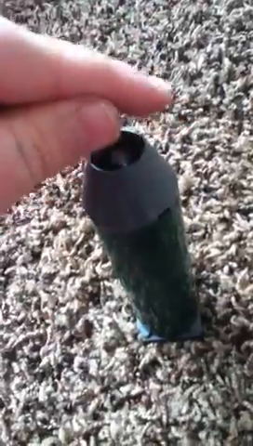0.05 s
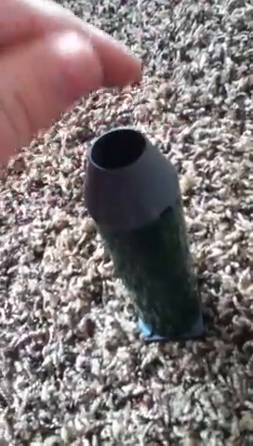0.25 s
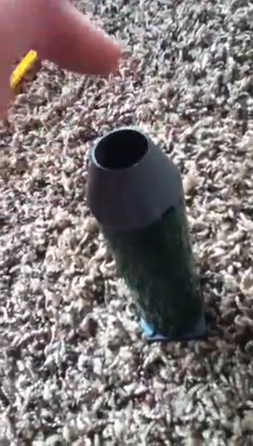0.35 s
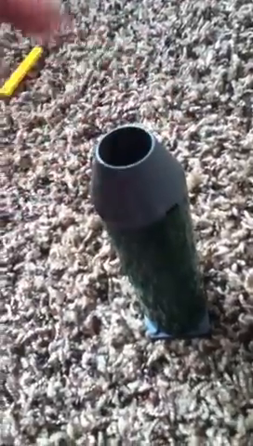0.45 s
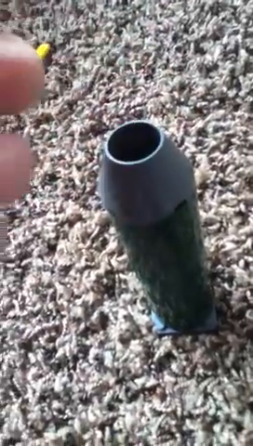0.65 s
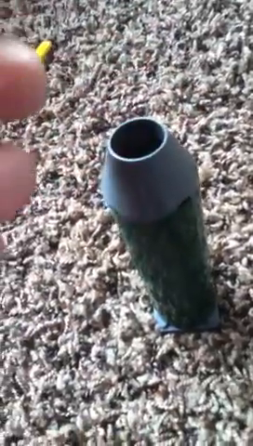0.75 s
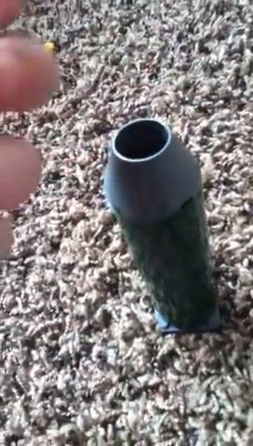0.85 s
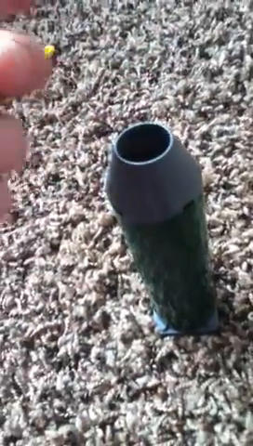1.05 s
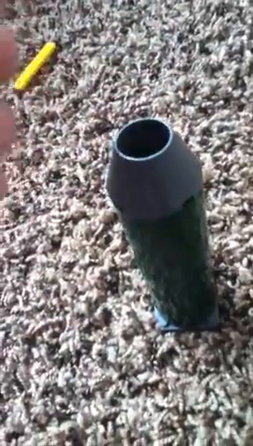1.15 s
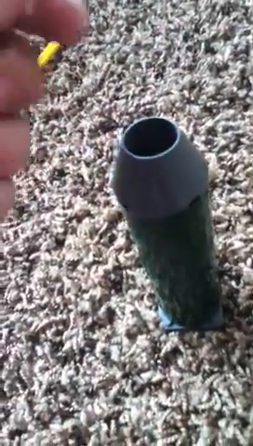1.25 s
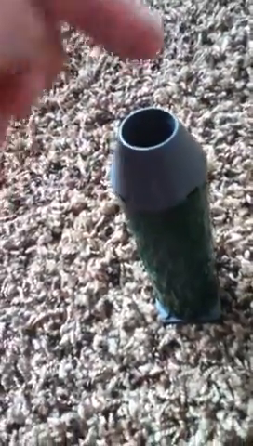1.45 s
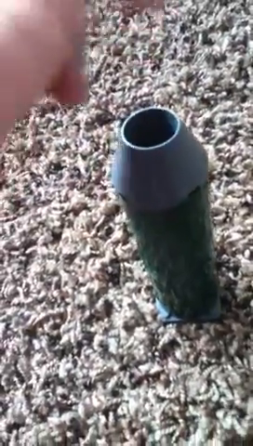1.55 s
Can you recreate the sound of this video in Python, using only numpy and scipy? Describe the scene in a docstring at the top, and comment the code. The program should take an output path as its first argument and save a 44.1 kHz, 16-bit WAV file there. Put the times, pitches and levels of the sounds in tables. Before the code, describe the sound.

Sharp, slightly hollow clicks sound as a small hard piece falls through a plastic tube, hits the base and settles in a quick, fading rattle. The microphone is close, in a quiet room with a faint low hum.

```python
"""A quiet carpeted room, one microphone close to an upright plastic tube standing on the floor.
A small hard piece is dropped in: it knocks from wall to wall on the way down, lands on the tube's
foot, then bounces, chatters and rolls to rest. Each touch is a short crack plus the ringing modes
of tube and piece. A few faint handling ticks follow, over low room noise and mains hum."""
import sys
import numpy as np
from scipy import signal
from scipy.fft import rfft, irfft, next_fast_len
from scipy.io import wavfile

SR = 44100
rng = np.random.default_rng(int(sys.argv[2]) if len(sys.argv) > 2 else 0)


def generate_wav(signal):
    """Clip the signal to [-1, 1] and save it as 16-bit WAV at the path in sys.argv[1]."""
    frames = np.transpose(np.atleast_2d(signal))
    scaled = np.clip(frames, -1, 1) * 32767
    pcm = np.round(scaled).astype(np.int16)
    wavfile.write(sys.argv[1], SR, pcm)


N = 70560
TIME = np.arange(N) / SR
RING_TIME = np.arange(SR // 4) / SR  # time axis of one decay

# room tone, spectrum: f/Hz, relative level/dB
ROOM_TONE_SPECTRUM = [(15, -56), (25, -21.5), (59, -9), (91, -13), (113, -1), (148, -8), (204, 0.5),
                      (297, -6), (523, -14), (871, -14), (1710, -22), (7700, -26), (15500, -30.5)]
# room tone, dipping briefly during the fall: t/s, relative level/dB
ROOM_TONE_LEVEL = [(0, 4.5), (.2, 3.5), (.26, -3), (.9, 1.5), (1.2, 2.5), (1.6, 3)]
# the room's reverberant tail: f/Hz, relative level/dB
TAIL_SPECTRUM = [(200, 17), (1800, 4.5), (4200, 1.5), (6000, -8), (9000, -23), (15000, -6.5)]
# handling ticks: t/s, level/dB, f/Hz, band edge/ratio to f
HANDLING_TICKS = [(1.01, -43, 4450, 1.27), (1.0171, -46.5, 4500, 1.2), (1.0223, -42, 3270, 1.66),
                  (1.092, -46, 4580, 1.27), (1.1162, -47.5, 3560, 1.26), (1.5582, -46.5, 3476, 1.65)]
# whirr of the rolling piece: f/Hz, relative level/dB
ROLL_SPECTRUM = [(300, -29.5), (600, -11.5), (780, 1.5), (1100, -8), (1700, -3), (3000, -34.5)]
# strength of the chatter on the foot: t/s, level/dB
CHATTER_LEVEL = [(.57, -57), (.61, -39), (.645, -43), (.69, -40.5), (.725, -38), (.755, -32.5), (.8, -38),
                 (.835, -65), (.865, -39), (.925, -48.5), (.97, -51), (1.02, -63.5)]
# modes of the tube: f/Hz, t60/s, level struck on the wall/dB, level struck on the foot/dB
TUBE_MODES = [(587, 0.03, -41.5, -41), (1653, .07, -28, -34), (1910, .026, -22, -25.5),
              (2542, 0.12, -21.5, -28), (2770, 0.066, -23, -18), (3236, 0.058, -22.5, -32.5),
              (3485, .05, -16, -15), (3810, 0.048, -14, -10), (3975, 0.047, -12.5, -10),
              (4150, 0.032, -10, -6), (4520, 0.065, -12, -18.5), (4854, 0.036, -9, -13.5),
              (5510, 0.022, -1, -4), (6020, 0.031, -9, -8.5), (6620, .02, -12.5, -21),
              (6840, .025, -18, -11), (7580, 0.021, -10.5, -13)]
# short, high modes of the piece: f/Hz, t60/s, level against the wall/dB, level against the foot/dB
PIECE_MODES = [(8840, 0.018, -10.5, -16), (9480, .014, -17, -17), (9830, 0.014, -9, -19),
               (10530, .016, -27.5, -29.5), (11840, .016, -25.5, -29.5)]
# crack of dense, short-lived modes at the wall: f/Hz, relative level/dB
WALL_CRACK_SPECTRUM = [(200, -40), (600, -24), (1100, -30), (1800, -8), (3000, -11), (4100, 8), (5000, 1),
                       (6400, 6.5), (8000, -8.5), (10500, -9), (13500, -16.5), (16000, -28.5)]
# the same crack at the foot: f/Hz, relative level/dB
FOOT_CRACK_SPECTRUM = [(200, -28.5), (600, -28.5), (1300, -19.5), (2200, -6), (3100, 1.5), (3900, 1.5),
                       (4700, -3), (6000, 6.5), (8000, -6), (9600, -9), (12000, -23.5), (14200, -24),
                       (16000, -31.5)]
# knocks on the wall: t/s, level/dB, bass/dB, treble/dB, f the struck spot favours/Hz,
# ring length/factor, hollow ring of the tube/dB
WALL_KNOCKS = [(0.2274, -8.5, 4, 4, 4240, .65, -7), (0.2577, -27, -5, 4.5, 4400, 1.2, -7),
               (0.2618, -16, 0, 1.5, 5500, 1.05, -2), (0.3176, -27, -3, -3, 3900, 1.5, 8),
               (0.3256, -18.5, -6, 0.5, 4450, 1.3, 13.5), (0.3596, -17, 7.5, -1, 4150, .8, -2),
               (.368, -28.5, -1, -4.5, 4800, 1.3, -0.5), (0.3713, -12, -6, 5, 8800, 1.05, 3),
               (0.3921, -46, 3.5, 7, 3500, 1.05, 0), (.4101, -54.5, -6.5, 3, 3423, 1.05, 1),
               (0.4199, -33.5, 6, -8, 4400, 0.79, 2), (.4392, -14, -3.5, 4.5, 5500, .95, -7.5),
               (0.4991, -17, 4, -10, 6400, 1.05, 2), (0.5163, -19, 1.5, -6, 4466, 0.9, 1.5)]
# bounces on the foot: t/s, level/dB, bass/dB, treble/dB, f the struck spot favours/Hz
FOOT_BOUNCES = [(0.561, -12.5, 1.5, 15, 3800), (0.5666, -12.5, -1.5, 12, 5900),
                (0.5957, -31.5, 7, -1, 4000), (0.6053, -39.5, 0, 25.5, 5900), (0.6158, -30.5, 5, -23, 4000),
                (0.661, -19, 1, 18, 3700), (0.6882, -20.5, -3, 5, 5600), (0.6936, -20, 1.5, 12, 5800),
                (0.699, -25.5, -7, 18, 7500), (0.712, -12, -11, 4.5, 7500), (0.7387, -23.5, -1, 9.5, 4100),
                (0.7422, -15.5, -5, 5.5, 4100), (0.75, -20, -8, 3, 5600), (0.7561, -19.5, -6, -4, 4100),
                (0.7649, -16.5, -17, 4, 4100), (0.7778, -20, -4.5, -1, 4100), (0.7902, -28, -1, 9, 4100),
                (0.7974, -23, -15, -7, 4100), (0.8077, -24.5, -9, 9.5, 6900), (0.8232, -17, -18, -13, 6000),
                (.8389, -28, -5, 9, 6800), (0.8463, -25, -9, -7, 6000), (0.8563, -28.5, -1, 9, 4100),
                (0.8642, -43.5, 22.5, -4, 4100), (0.8708, -32, -7, 6, 5700),
                (0.8714, -20, -13.5, 9.5, 5940), (0.886, -36, -3, -5, 6000),
                (0.8953, -20.5, -12.5, 13.5, 6600), (0.8976, -40, 14, 25.5, 4100), (.915, -36, 3, 9, 6000),
                (0.919, -31.5, 1.5, 15, 6000), (0.932, -34, 0, -10, 4100), (0.9422, -27.5, -9, -4.5, 6500),
                (0.9596, -39, -3, 11, 4100), (0.964, -37.5, 3.5, 14, 4100), (0.9827, -39, -3, -11, 4100)]


def from_db(db):
    """Decibels to gain."""
    return 10 ** (np.asarray(db) / 20)


def colour(x, spectrum):
    """Minimum-phase filter with the given spectrum; white noise keeps its power."""
    size = next_fast_len(2 * len(x)) * 2
    hz, db = np.transpose(spectrum)
    bin_hz = np.arange(size // 2 + 1) * SR / size
    gain = from_db(np.interp(np.log(bin_hz + 1), np.log(hz), db))
    gain /= np.sqrt(np.mean(gain ** 2))
    cepstrum = irfft(np.log(gain))
    cepstrum[1:size // 2] *= 2
    cepstrum[size // 2 + 1:] = 0
    return irfft(rfft(x, size) * np.exp(rfft(cepstrum)))[:len(x)]


def bell(x, hz, db, q):
    """Lift or cut a band."""
    w, g = 2 * np.pi * hz / SR, from_db(db / 2)
    a = np.sin(w) / (2 * q)
    middle = -2 * np.cos(w)
    return signal.lfilter([1 + a * g, middle, 1 - a * g], [1 + a / g, middle, 1 - a / g], x)


def decay(t60):
    """Exponential fade, 60 dB down after t60 seconds."""
    return np.exp(-np.log(1000) * RING_TIME / t60)


def burst(t60):
    """Dying noise that holds all frequencies about evenly."""
    fade = np.sqrt(decay(t60))  # applied twice, before and after flattening
    spectrum = rfft(rng.standard_normal(len(fade)) * fade)
    even = irfft(spectrum / np.abs(spectrum), len(fade)) * fade
    return even * np.sqrt(np.sum(fade ** 4) / np.sum(even ** 2))


def add(out, t, sound):
    """Mix a sound in at t seconds."""
    start = int(t * SR)
    out[start:start + len(sound)] += sound[:N - start]


def room_tone(noise_db=-62.5, hum_hz=120, hum_db=-71):
    """The bed under everything: low room noise and a faint mains hum."""
    level = from_db(noise_db + np.interp(TIME, *np.transpose(ROOM_TONE_LEVEL)))
    noise = colour(rng.standard_normal(N + SR), ROOM_TONE_SPECTRUM)[SR:]
    hum = from_db(hum_db) * np.sqrt(2) * np.sin(2 * np.pi * hum_hz * TIME)
    return level * noise + hum


def room_tail(direct, t60=0.22, db=-20.5, delay_s=0.012):
    """The carpeted room's short, dull tail, reaching the microphone just after the direct sound."""
    tail = colour(burst(t60) * (RING_TIME > delay_s), TAIL_SPECTRUM)
    tail /= np.sqrt(np.sum(tail ** 2))
    return from_db(db) * signal.fftconvolve(direct, tail)[:N]


def handling_ticks():
    """Faint ticks of handling, each a tiny burst of noise in one band."""
    out = np.zeros(N)
    for t, db, hz, edge in HANDLING_TICKS:
        band = [(hz / edge ** 2, -18), (hz / edge, -5), (hz, 0), (hz * edge, -6), (hz * edge ** 2, -22)]
        add(out, t, from_db(db) * colour(burst(t60=0.012), band))
    return out


def roll(peak_s=0.85, spread_s=0.076, peak_db=-60):
    """The piece rolls on its edge: a soft whirr that swells and fades."""
    swell = np.exp(-0.5 * ((TIME - peak_s) / spread_s) ** 2)
    return from_db(peak_db) * swell * colour(rng.standard_normal(N), ROLL_SPECTRUM)


def chatter(spots=6, touches_per_s=380, scatter_db=3.3):
    """The piece rocks on the foot: quick, uneven little touches, dealt to a few spots."""
    t, db = np.transpose(CHATTER_LEVEL)
    count = N // 100  # ample; those past the table's end stay silent
    jitter, polarity, place = rng.random((count, 3)).T
    times = t[0] + (np.arange(count) + jitter) / touches_per_s
    touch_db = np.interp(times, t, db) + scatter_db * rng.standard_normal(count)
    pushes = from_db(touch_db) * np.sign(polarity - 0.5)
    out = np.zeros(N)
    for spot in range(spots):
        here = (times < t[-1]) & ((place * spots).astype(int) == spot)
        impulses = np.zeros(N)
        impulses[(times[here] * SR).astype(int)] = pushes[here]
        out += signal.fftconvolve(impulses, contact(on_foot=True))[:N]
    return out


def contact(on_foot, ring_factor=1, scatter_db=1.85):
    """One touch: a crack and the modes of tube and piece, each mode at a slightly random strength."""
    hz, t60, wall_db, foot_db = np.transpose(TUBE_MODES + PIECE_MODES)
    mode_db = (foot_db if on_foot else wall_db) + scatter_db * rng.standard_normal(len(hz))
    gains = from_db(mode_db) * (-1) ** np.arange(len(hz))  # alternating polarity
    modes = np.sin(2 * np.pi * hz[:, None] * RING_TIME) * decay(ring_factor * t60[:, None])
    if on_foot:
        crack = from_db(-0.5) * colour(burst(t60=ring_factor * 0.014), FOOT_CRACK_SPECTRUM)
    else:
        crack = colour(burst(t60=ring_factor * 0.019), WALL_CRACK_SPECTRUM)
    return gains @ modes + crack


def blow(touch, db, bass_db, treble_db, spot_hz, spot_lift_db=7):
    """Colour a touch by where and how sharply the piece meets the tube."""
    hit = bell(touch, spot_hz, spot_lift_db, q=9.4) * from_db(db - spot_lift_db / 2)
    hit = bell(hit, hz=1900, db=bass_db, q=1)
    return bell(hit, hz=10650, db=treble_db, q=0.91)


def knocks_and_bounces():
    """The piece knocks down the wall, waking the tube's hollow ring, then bounces on the foot."""
    out = np.zeros(N)
    for t, *manner, ring_factor, hollow_db in WALL_KNOCKS:
        knock = blow(contact(on_foot=False, ring_factor=ring_factor), *manner)
        add(out, t, bell(knock, hz=2580, db=hollow_db, q=3.1))
    for t, *manner in FOOT_BOUNCES:
        add(out, t, blow(contact(on_foot=True), *manner))
    return out


def scene(bass_cut_hz=110):
    """At the microphone, in mono: the tube up close, the room well behind it."""
    # the knocks and chatter carry no deep bass
    low_cut = signal.butter(2, bass_cut_hz, "high", fs=SR, output="sos")
    tube = signal.sosfilt(low_cut, knocks_and_bounces() + chatter())
    direct = tube + roll() + handling_ticks()
    return (direct + room_tail(direct) + room_tone())[None]


def record(dry, cutoff_hz=15600):
    """A steep high cut after the microphone."""
    return signal.sosfilt(signal.cheby1(12, 0.2, cutoff_hz, fs=SR, output="sos"), dry)


dry = scene()
out = record(dry)
generate_wav(out)
```